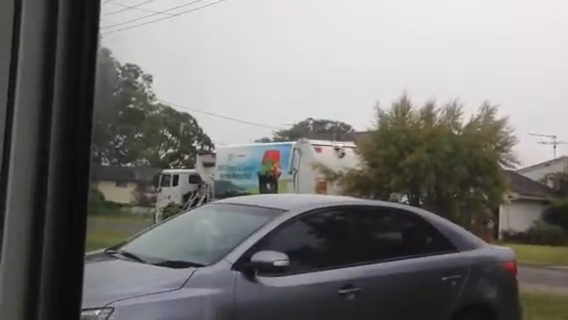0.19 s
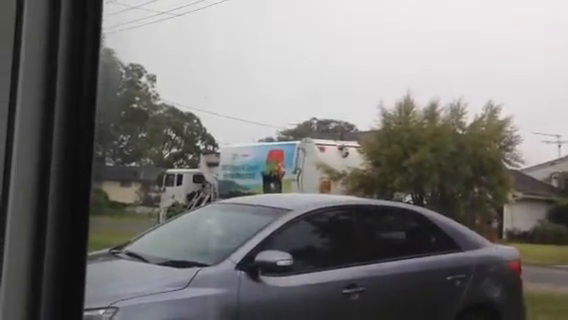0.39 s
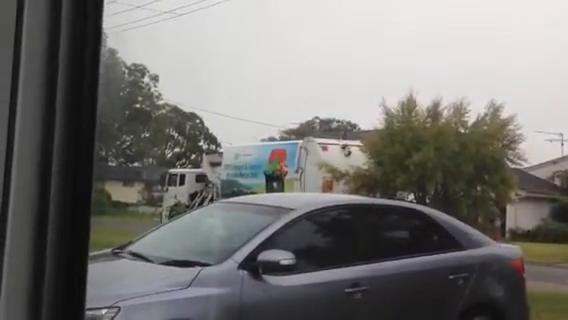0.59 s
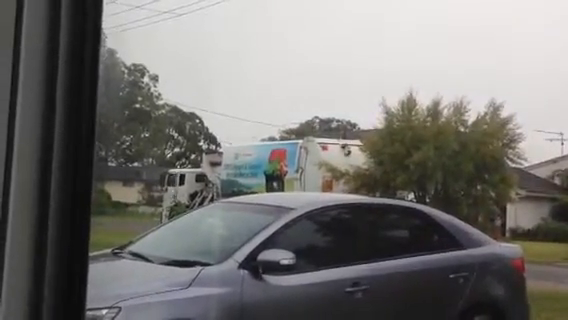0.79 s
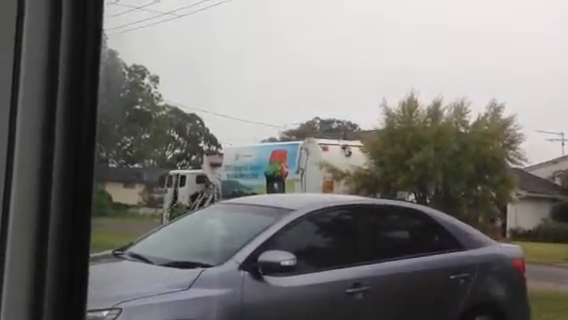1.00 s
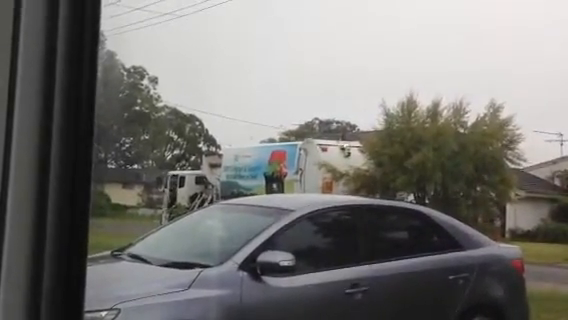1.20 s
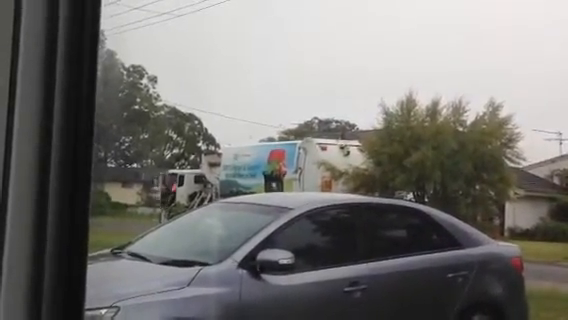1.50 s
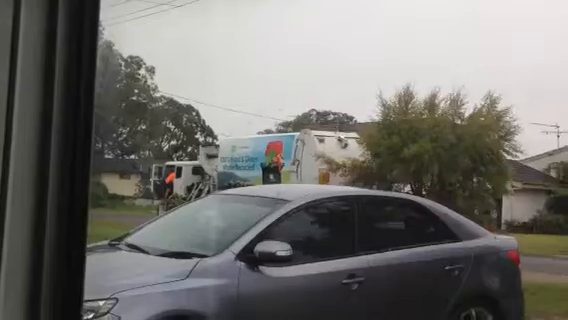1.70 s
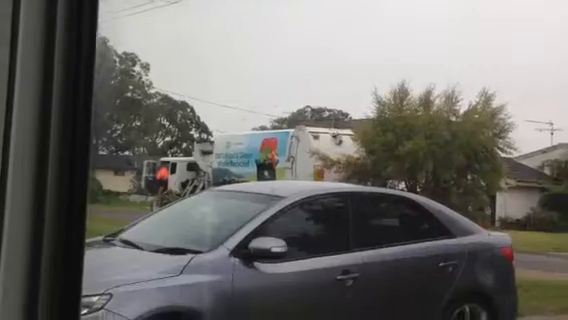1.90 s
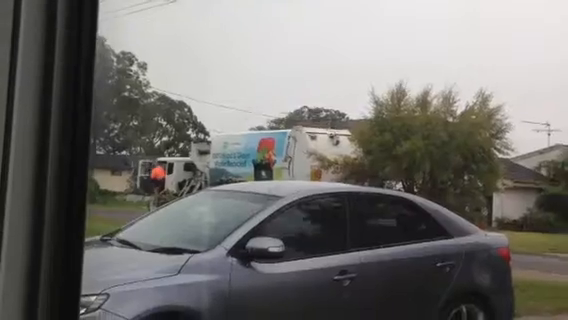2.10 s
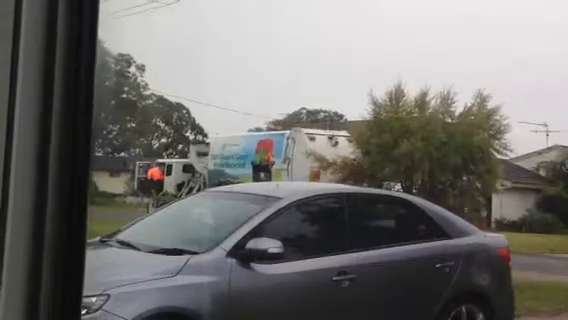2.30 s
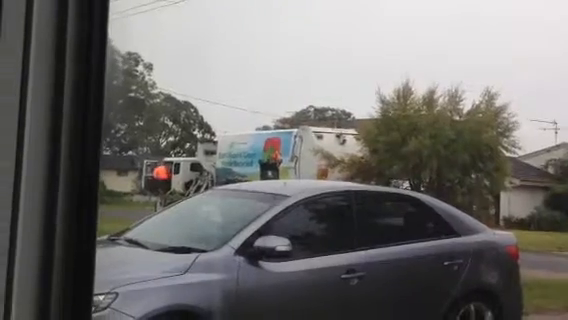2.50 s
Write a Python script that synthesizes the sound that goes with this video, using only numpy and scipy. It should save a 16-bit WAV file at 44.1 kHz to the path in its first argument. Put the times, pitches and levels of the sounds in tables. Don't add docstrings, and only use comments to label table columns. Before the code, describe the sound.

Truck air brake vents in a loud half-second hiss over a quiet, steadily idling diesel engine

```python
import sys
import numpy as np
from scipy import signal
from scipy.fft import rfft, irfft
from scipy.io import wavfile

SR = 44100
rng = np.random.default_rng(int(sys.argv[2]) if len(sys.argv) > 2 else 0)


def gain_from_db(level_db):
    decades = np.asarray(level_db, float) / 20
    return 10 ** decades


def transcribe(u):
    v = np.clip(np.atleast_2d(u).T, -1, 1)
    q = np.round(v * 32767).astype(np.int16)
    wavfile.write(sys.argv[1], SR, q)


N = 114660


def rms_one(x):
    return x / np.sqrt(np.mean(x ** 2) + 1e-20)


def in_time(rows):
    s, *columns = np.transpose(rows)
    return [np.interp(np.arange(N) / SR, s, c) for c in columns]


def drift(rate):
    step = 40
    r = np.exp(-2 * np.pi * rate * step / SR)
    noise = rng.standard_normal(N // step + 2002)
    slow = signal.lfilter([1], [1, -2 * r, r * r], noise)[2000:]
    return np.interp(np.arange(N) / step, np.arange(len(slow)), rms_one(slow))


def resonance(x, hz, width_hz):
    r = np.exp(-np.pi * width_hz / SR)
    poles = [1, -2 * r * np.cos(2 * np.pi * hz / SR), r * r]
    return signal.lfilter(np.array([1, 0, -1]) * (1 - r * r) / 2, poles, x)


def whistle(hz, width_hz):
    once = resonance(rng.standard_normal(N), hz, width_hz)
    return rms_one(resonance(once, hz, width_hz))


def bands(spectrum, patchy_db, rate):
    hz, db = np.transpose(spectrum)
    f = np.fft.rfftfreq(N, 1 / SR) + 1
    colour = gain_from_db(np.interp(np.log(f), np.log(hz), db, left=-90, right=-90))
    shaped = rfft(rng.standard_normal(N)) * colour
    centres = hz[0] * 2 ** np.arange(0, np.log2(hz[-1] / hz[0]) + 1 / 3, 1 / 3)
    rows = []
    for c in centres:
        triangle = np.clip(1 - 3 * abs(np.log2(f / c)), 0, 1)
        rows.append(irfft(shaped * triangle, N) * gain_from_db(patchy_db * drift(rate)))
    rows = np.array(rows)
    return centres, rows / np.sqrt(np.mean(rows.sum(0) ** 2))


FIRING_HZ, CYCLE_START_S = 42.375, .0175

# multiple of the firing rate, level in dB rms.
EXHAUST_ORDERS = [(1, -46), (2, -57.5), (3, -65.5), (3.45, -61), (5, -63.5), (6, -62)]
# frequency in Hz, density in dB per Hz.
RUMBLE_SPECTRUM = [(20, -21), (65, -9), (100, -4.5), (213, -18), (510, -28), (887, -20), (1200, -19.5),
                   (1500, -52)]
# frequency in Hz, width in Hz, level in dB.
BODY_PANELS = [(300.6, 25, -68.5), (362, 64, -65.5), (442.4, 63, -68.5), (620.5, 135, -65),
               (260.2, 5.2, -77)]


def exhaust():
    turn = 2 * np.pi * (FIRING_HZ * (np.arange(N) / SR - CYCLE_START_S) - .5)
    tones = 0
    for k, db in EXHAUST_ORDERS:
        tones = tones - np.sqrt(2) * gain_from_db(db + 0.23 * k * drift(7.5)) * np.cos(k * turn)
    boom = gain_from_db(-54.5) * whistle(hz=203.2, width_hz=39)
    panels = sum(gain_from_db(db) * whistle(hz, width) for hz, width, db in BODY_PANELS)
    rumble = bands(RUMBLE_SPECTRUM, patchy_db=0.5, rate=6.8)[1].sum(0)
    return tones + boom + panels + gain_from_db(-55.5) * rumble


# frequency in Hz, T60 in seconds, lag after the crest in seconds.
BLOCK_MODES = [(995.8, .11, .004), (1081.5, .07, .004), (1589.5, .075, -.011), (1702.5, .065, -.011),
               (2290, .05, .0), (826.3, .08, .008)]
BLOCK_LEVELS = [-56.5, -61.5, -56.5, -59, -62, -73]
# one mode's strength in dB, one column for each of six cylinders.
CYLINDER_FORCES = [(6, -14, -4, 2, 3, 4), (5, -6, -5, 4, 4, 4), (8, -1, 4, -1, -5, -9),
                   (8, -6, 2, 2, -5, -4), (2, -1, 0, 2, -1, -1), (0, -3, 1, 3, 1, 1)]
KNOCK_SPREAD_DB, KNOCK_SLIP = 2.0, .08
KNOCK_WIDTH_HZ = 100


def knock():
    firing, out = np.arange(int(N / SR * FIRING_HZ)), 0
    for (hz, t60, lag), db, forces in zip(BLOCK_MODES, BLOCK_LEVELS, CYLINDER_FORCES):
        s = CYCLE_START_S + firing / FIRING_HZ + lag
        s = (np.round(s * hz) + KNOCK_SLIP * rng.standard_normal(len(s))) / hz
        force_db = np.array(forces)[firing % 6] + KNOCK_SPREAD_DB * rng.standard_normal(len(s))
        clicks = np.zeros(N + SR)
        clicks[(s * SR).astype(int)] = gain_from_db(force_db)
        r, w = gain_from_db(-60 / (t60 * SR)), 2 * np.pi * hz / SR
        rung = signal.lfilter([0, np.sin(w)], [1, -2 * r * np.cos(w), r * r], clicks[:N] + 1e-18)
        out = out + gain_from_db(db) * rms_one(resonance(rung, hz, KNOCK_WIDTH_HZ))
    return out


# frequency in Hz, density in dB per Hz.
CLATTER_SPECTRUM = [(1250, -12), (1420, -15.5), (1700, -5.5), (2000, -6.5), (2700, -12), (5770, -16.5),
                    (7170, -22.5), (15300, -37.5)]
# frequency in Hz, width in Hz, level in dB.
CLATTER_RESONANCES = [(3920, 160, -12.5), (5780, 76, -19.5), (4970, 170, -19.5), (2396, 125, -14.5)]
# frequency in Hz, level in dB.
GEAR_TONES = [(707, -71), (932.5, -69), (869, -71), (1129.6, -67), (1189, -70), (1277.6, -70), (424, -69),
              (2465, -67)]
# time in seconds, level in dB.
LEAK_LEVELS = [
    (0, -74),
    (.8, -49.5),
    (1.5, -52.5),
    (2.0, -53.5),
    (2.12, -58),
    (2.6, -59),
]
CLATTER_DB, CLATTER_SWING_DB, CLATTER_LAG = -49, 0.68, 0.048
LEAK_HZ, LEAK_WANDER_HZ, LEAK_THROB = 1921, 2.5, .5


def clatter():
    turns = FIRING_HZ / 3 * (np.arange(N) / SR - CYCLE_START_S) - CLATTER_LAG
    hiss = bands(CLATTER_SPECTRUM, patchy_db=1.5, rate=3.7)[1].sum(0)
    hiss = hiss + sum(gain_from_db(db) * whistle(hz, width) for hz, width, db in CLATTER_RESONANCES)
    swing = np.cos(2 * np.pi * turns)
    swing = swing + 0.16 * np.cos(np.pi * turns) + 0.47 * np.cos(4 * np.pi * turns)
    swell = gain_from_db(CLATTER_DB + CLATTER_SWING_DB * swing)
    gears = sum(gain_from_db(db) * whistle(hz, 12) for hz, db in GEAR_TONES)
    pitch = LEAK_HZ + LEAK_WANDER_HZ * (drift(1.73) + 3 * drift(40.5))
    throb = 1 + LEAK_THROB * np.cos(6 * np.pi * turns)
    leak = np.sin(2 * np.pi * np.cumsum(pitch) / SR) * throb * gain_from_db(2.1 * drift(9))
    return swell * hiss + gears + gain_from_db(in_time(LEAK_LEVELS)[0]) * leak


# time in seconds, jet level in dB, brightness in dB per octave,
# low pipe whistle in dB, high pipe whistle in dB.
BRAKE_VALVE = [
    (.195, -45, 1.5, 3, -17),
    (.217, -24, 1, 9, 1),
    (.242, -20, -1.5, -6, 0),
    (.331, -25.5, 2, 6, -7),
    (.36, -19, 0, -1, 1),
    (.525, -20.5, 0, -8, -6),
    (.575, -20, -1, 3.5, -7),
    (.65, -24, 0, 4, 8.5),
    (.702, -25, -2.5, 1, 3.5),
]
# frequency in Hz, density in dB per Hz.
JET_SPECTRUM = [(400, -19.5), (725, -19.5), (1200, -18), (2300, -1), (6200, -1), (7200, -3.5), (10000, -7),
                (15300, -20.5)]
# frequency in Hz, width in Hz, level in dB.
LOW_PIPE_MODES = [(2350, 130, -14), (1815, 40, -24), (2207, 40, -22)]
MID_PIPE_MODES = [(3554, 270, -15), (4124, 290, -13.5), (4840, 70, -32), (4980, 62, -22), (3260, 45, -19.5),
                  (5270, 50, -20)]
HIGH_PIPE_MODES = [(5860, 74, -15.5), (6200, 370, -11.5), (5550, 450, -17)]
# frequency in Hz, density in dB per Hz.
ECHO_SPECTRUM = [(1060, -23), (1800, -15), (2230, -8.5), (2710, -14), (3510, -3), (4800, -10.5), (6170, -7),
                 (6860, -15), (15200, -27.5)]
# frequency in Hz, width in Hz, level in dB.
ECHO_RESONANCES = [(3630, 1200, -10), (6200, 510, -22), (2345, 220, -9)]
# frequency in Hz, density in dB per Hz.
SEEP_SPECTRUM = [(2500, -10), (3800, 5), (6000, 0), (10000, -1), (12000, -10), (15300, -18)]
ECHO_DB, ECHO_DELAY_S = -14, 0.036
ECHO_T60_S, ECHO_T60_PER_OCTAVE = 1, -0.15
SEEP_DB, SEEP_END_S, SEEP_FADE_S = -53.5, 1.045, .04
SHUT_DB_PER_S = 430


def air_brake():
    level_db, tilt_db, low_db, high_db = in_time(BRAKE_VALVE)
    t = np.arange(N) / SR
    opening = np.clip((t - BRAKE_VALVE[0][0]) / 0.033 + 1, 0, 1)
    flow = gain_from_db(level_db - SHUT_DB_PER_S * np.maximum(t - BRAKE_VALVE[-1][0], 0)) * opening

    centres, rows = bands(JET_SPECTRUM, patchy_db=.9, rate=11.0)
    jet = sum(row * gain_from_db(tilt_db * np.log2(hz / 4500)) for hz, row in zip(centres, rows))
    jet = jet - 0.55 * resonance(jet, hz=2870, width_hz=450)
    pipe_sets = (LOW_PIPE_MODES, low_db), (MID_PIPE_MODES, -high_db / 2), (HIGH_PIPE_MODES, high_db)
    for pipes, sway_db in pipe_sets:
        for hz, width, db in pipes:
            jet = jet + gain_from_db(db + sway_db + 1.9 * drift(8)) * whistle(hz, width)

    layers = list(zip(*bands(ECHO_SPECTRUM, patchy_db=0.0, rate=15.0)))
    layers += [(hz, gain_from_db(db) * whistle(hz, width)) for hz, width, db in ECHO_RESONANCES]
    late_power, echo = np.roll(flow ** 2, int(ECHO_DELAY_S * SR)), 0
    for hz, row in layers:
        t60 = max(ECHO_T60_S + ECHO_T60_PER_OCTAVE * np.log2(hz / 4500), .1)
        keep = gain_from_db(-120 / (SR * t60))
        echo = echo + row * np.sqrt(signal.lfilter([1 - keep], [1, -keep], late_power))

    seep = bands(SEEP_SPECTRUM, patchy_db=1.0, rate=6.0)[1].sum(0)
    seeping = (t > BRAKE_VALVE[1][0]) * np.clip((SEEP_END_S - t) / SEEP_FADE_S + .5, 0, 1)
    return flow * jet + gain_from_db(ECHO_DB) * echo + gain_from_db(SEEP_DB) * seeping * seep


# start in seconds, rise in seconds, level in dB, pitch in Hz, rattle in dB.
TANK_SHUDDERS = [
    (.232, 0.029, -25, 195.5, -38.5),
    (0.289, 0.023, -32.5, 197.8, -70),
    (.362, 0.017, -25, 203, -41.5),
    (0.409, 0.043, -30.5, 201.5, -48.5),
    (0.543, .026, -25.5, 192.5, -38),
    (.66, 0.033, -41, 192.7, -45.5),
    (.77, 0.051, -44, 209, -62),
]
RATTLE_LAG_S, RATTLE_TOP_HZ = 0.022, 537
SHUDDER_ROUGH_HZ, SHUDDER_ROUGH = 30, .4
OVERTONE, OVERTONE_DB = 1.5, -13
GROAN_START_S, GROAN_END_S, GROAN_DB = 0.17, 0.82, -42.5


def tank():
    t, out = np.arange(N) / SR, 0
    dull = signal.butter(2, [90, RATTLE_TOP_HZ], "band", fs=SR, output="sos")
    rattle = rms_one(signal.sosfilt(dull, rng.standard_normal(N)))
    wobble = 1 + SHUDDER_ROUGH / 2 * drift(SHUDDER_ROUGH_HZ)
    slip = SHUDDER_ROUGH * drift(SHUDDER_ROUGH_HZ)
    for s, rise, db, hz, rattle_db in TANK_SHUDDERS:
        u = np.maximum(t - s, 0) / rise
        v = np.maximum(t - s - RATTLE_LAG_S, 0) / rise
        phase = 2 * np.pi * hz * (t - s)
        modes = np.sin(phase + slip) + gain_from_db(OVERTONE_DB) * np.sin(OVERTONE * phase - 2 * slip)
        out = out + gain_from_db(db) * wobble * u * np.exp(.5 - u * u / 2) * modes
        out = out + gain_from_db(rattle_db) * v * np.exp(1 - v) * rattle
    groaning = np.clip(np.minimum(t - GROAN_START_S, GROAN_END_S - t) / 0.13, 0, 1)
    return out + gain_from_db(GROAN_DB) * groaning * whistle(hz=129, width_hz=87)


def scene():
    mono = exhaust() + knock() + clatter() + air_brake() + tank()
    return np.array([mono, mono])


def band_limit(x):
    return signal.sosfilt(signal.butter(12, 15330, fs=SR, output="sos"), x)


# centre in seconds, low edge in Hz, high edge in Hz,
# level in dB.
TREBLE_PARTINGS = [
    (0.512, 6200, 8900, -28.5),
    (.514, 9600, 10900, -36),
    (.607, 8300, 9800, -36),
]
PARTING_S, CUT_HZ = 0.044, 15330


def record(dry):
    t, f, side = np.arange(N) / SR, np.fft.rfftfreq(N, 1 / SR), 0
    for s, low_hz, high_hz, db in TREBLE_PARTINGS:
        in_band = (f > low_hz) * (f < high_hz)
        noise = rms_one(irfft(rfft(rng.standard_normal(N)) * in_band, N))
        side = side + gain_from_db(db) * noise * np.cos(np.pi * np.clip((t - s) / PARTING_S, -.5, .5))
    parted = dry + side * np.array([[1], [-1]])
    mix = irfft(rfft(parted) * (f < CUT_HZ), N)
    return band_limit(mix)


dry = scene()
out = record(dry)
transcribe(out)
```